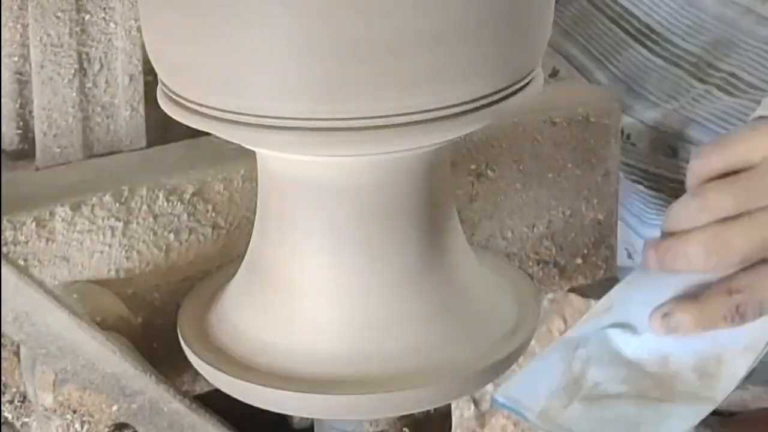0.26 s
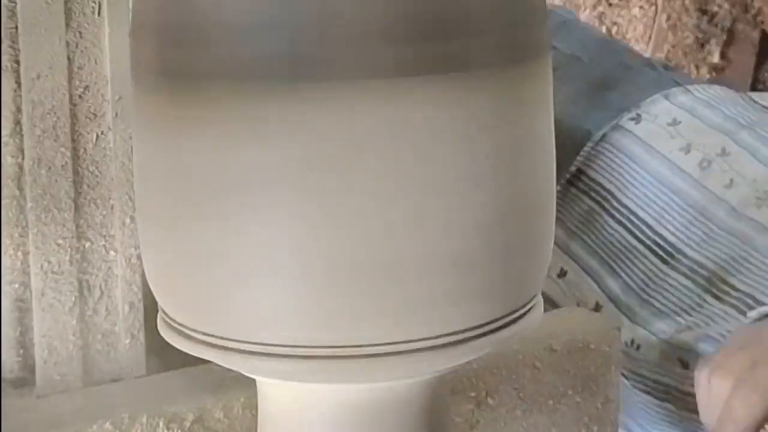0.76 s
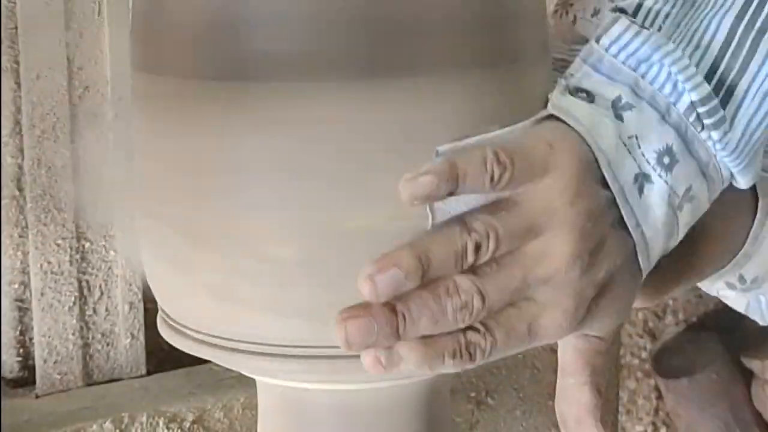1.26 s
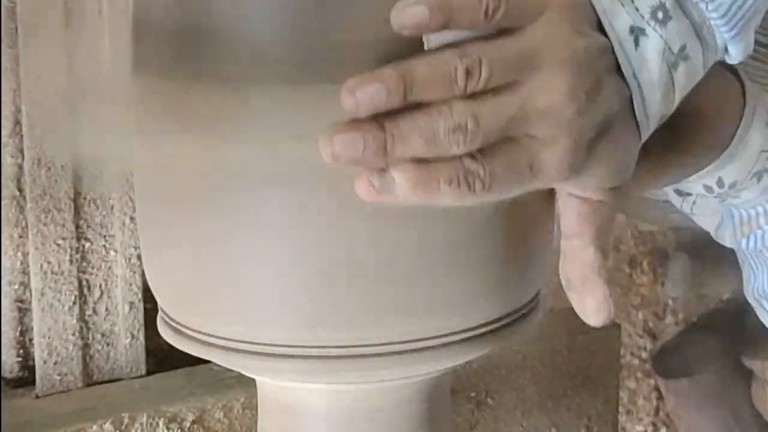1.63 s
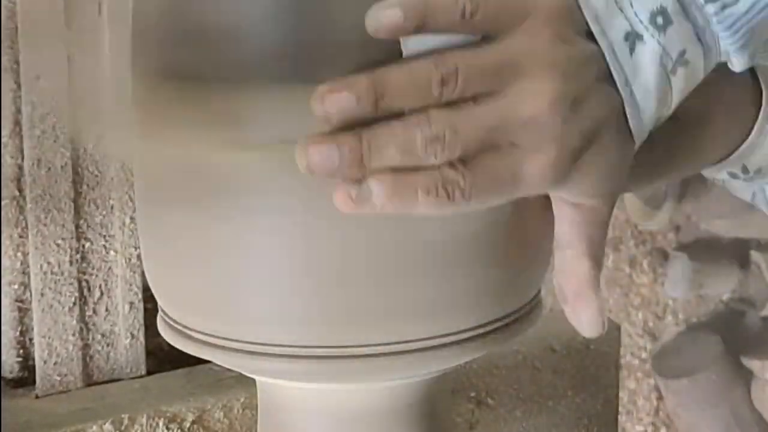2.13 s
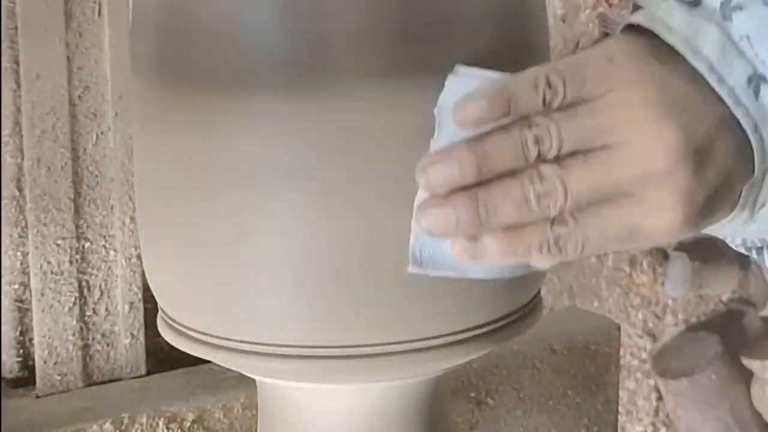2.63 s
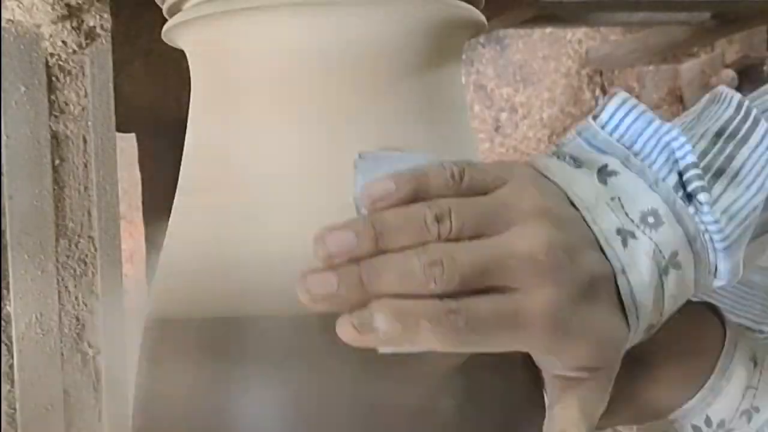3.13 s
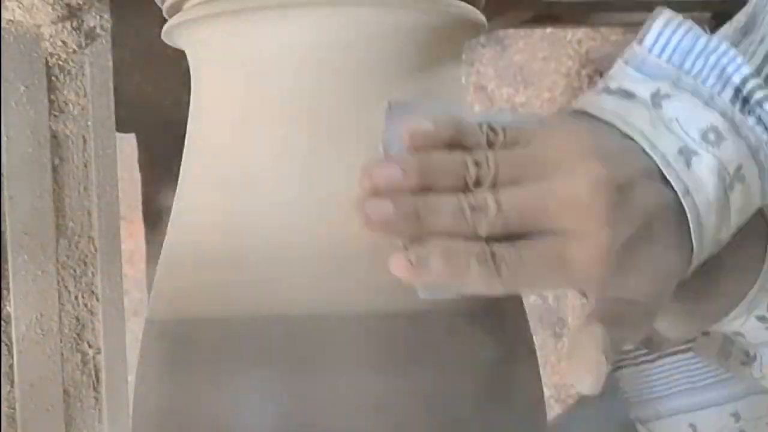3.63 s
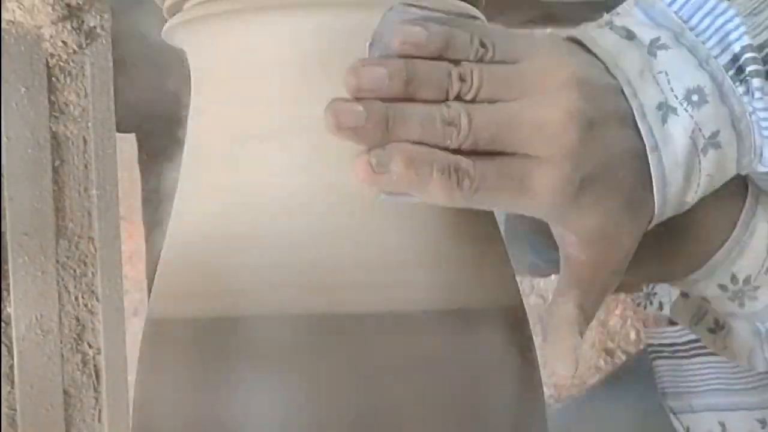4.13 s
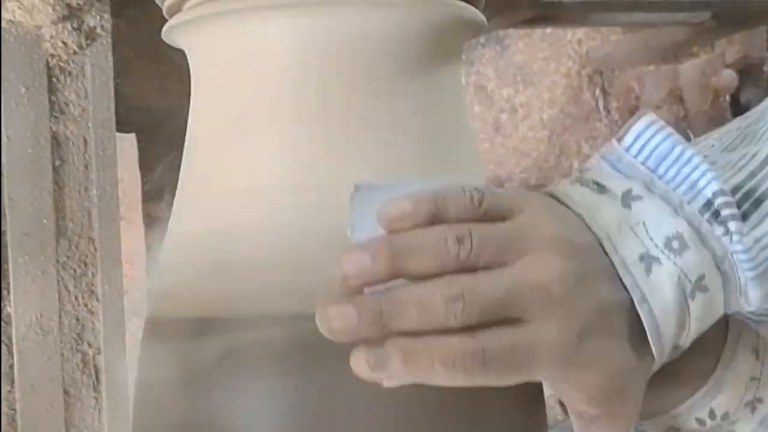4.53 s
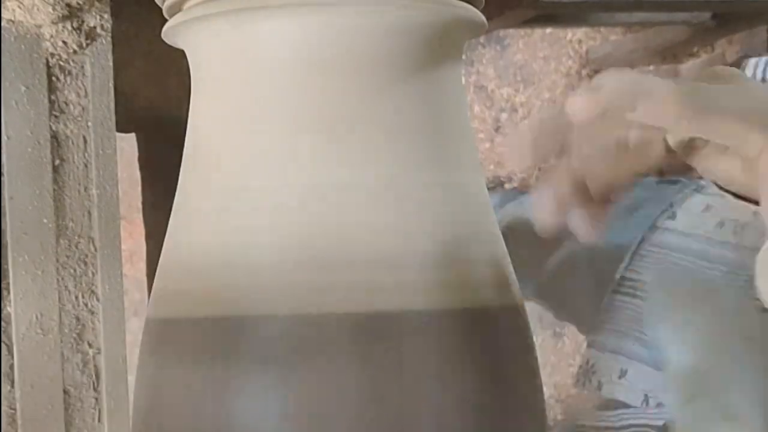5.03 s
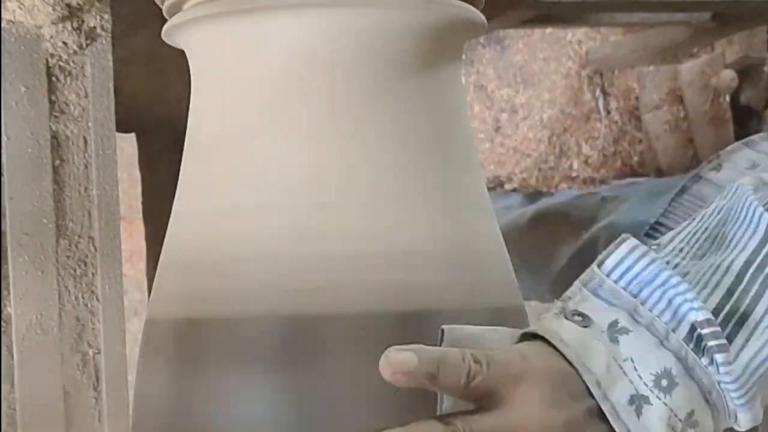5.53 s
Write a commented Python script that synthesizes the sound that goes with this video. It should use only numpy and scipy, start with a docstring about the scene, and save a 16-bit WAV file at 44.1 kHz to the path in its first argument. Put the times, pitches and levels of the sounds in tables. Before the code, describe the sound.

A close, dry stereo view of sanding in a small workshop. A lathe runs throughout: a thin bearing whine near 825 Hz with weaker neighbouring tones, wavering and briefly breaking, over a faint low throb of nearly four beats per second and a soft broad rumble. Sandpaper hiss, bright and slightly left, comes in strokes. A very faint one ends by 0.2 s; fuller ones run 0.4-0.75 and 0.9-1.1 s, with a quick dull touch at 1.2 s leading straight into a long, strong stroke until 2.6 s, easing slightly. Another follows at 2.65-2.95, a stronger one at 3.0-3.6, then a long, smooth, airy one at 3.65-4.75 s with small catches. A short, coarser stroke starts at 4.8 s with a tiny dull tap and lifts at 5.0; a soft low bump follows at 5.1. After a gap of machine sound, the last stroke hisses from 5.3 s, weakening towards the end. Echo is faint and short.

```python
"""In a small workshop, close to a two-port microphone, sandpaper is held against a wooden vase on a lathe.
Strokes of random grit scratches hiss brightly and stop as the hand lifts; one landing taps the wood, and
once the hand bumps the work, sounding a few damped modes. Underneath, the bearing whines in wavering
partials, two close drive tones throb, and noise rings the frame. A short echo follows sheet and tap.
"""
import sys
import numpy as np
from scipy import signal
from scipy.fft import rfft, irfft
from scipy.io import wavfile

SR = 44100
rng = np.random.default_rng(int(sys.argv[2]) if len(sys.argv) > 2 else 0)


def inscribe(sig):
    """Save sig as 16-bit PCM at rate SR to the path in sys.argv[1].

    A 1-D sig is mono; a 2-D sig holds one channel per row.
    Samples are clipped to [-1, 1] before scaling.
    """
    pcm = np.round(np.clip(np.atleast_2d(sig).T, -1, 1) * 32767)
    wavfile.write(sys.argv[1], SR, pcm.astype(np.int16))


N = 254456
TIME, FREQS = np.arange(N) / SR, np.fft.rfftfreq(N, 1 / SR)

# Strokes of the sheet. Each row: touch, lift and release in seconds, hiss level in dB, change until the
# lift in dB, rasp, ring and sheen over the hiss in dB, extra rasp at the touch in dB, left minus right in dB.
STROKES = [(-0.09, 0.202, 0.027, -63.5, 7, -8.5, -14, 3, -7, 5.5),
           (0.389, 0.738, 0.042, -51.5, 0.3, -13, -16.5, -2, -1.5, 5.5),
           (0.88, 1.104, 0.015, -52.5, 1, -15.5, -16.5, 2.5, 2.5, 4.5),
           (1.186, 1.237, 0.072, -59, -8, -16, -9, -4, 5, 6),
           (1.238, 2.568, 0.05, -46.5, -2.9, -12.5, -15, 3, 7, 4),
           (2.66, 2.938, 0.053, -51, 1.5, -14.5, -23, 1, 2.5, 5),
           (2.996, 3.557, 0.082, -47.5, -2.5, -19, -18, 1.8, 8, 3.5),
           (3.664, 4.736, 0.047, -49, 1.5, -20, -21, -1, -9, 3.5),
           (4.821, 5.013, 0.046, -56, 4.5, -8.5, -16, 1, -1, 4),
           (5.328, 5.848, .03, -49.5, -6, -12, -20, 3, 8, 4)]
ATTACK_S = 0.016  # the sheet settles on the wood
# Each stroke starts with its extra rasp, which fades; dB of sheen lost per dB of extra rasp.
FRESH_RASP_S, FRESH_DULLING = 0.15, 0.73
# Colours of the four parts of the scratching. Each row: frequency in Hz, relative level in dB.
RASP_COLOUR = [(700, -24), (1600, -9), (2400, -6), (3100, -1), (3800, .3), (4400, -2), (5200, -10),
               (7500, -35)]
RING_COLOUR = [(3600, -13), (4300, -1.5), (4900, 0), (5500, -1.5), (6000, -6), (7000, -25)]
HISS_COLOUR = [(5100, -35), (5800, -13), (6400, -5), (7100, -.3), (8500, 0), (10000, -1.7), (11300, -3.7),
               (12500, -4), (15000, -30)]
SHEEN_COLOUR = [(8500, -14), (11500, -11), (13000, -3.5), (14000, -1), (14700, .5), (15500, -2)]
# The two microphone ports hear the treble differently. Each row: frequency in Hz, left minus right in dB.
PORT_TILT = [(2000, -2.5), (5800, -4), (7100, -1.5), (8700, -5), (11000, -3.5), (12800, -1), (14500, 2)]
DRIFT_DB, DRIFT_HZ = .8, 9  # the fingers never press evenly, so hiss and sheen drift apart
ROCK_DB, ROCK_HZ = 1.3, 12  # the sheet rocks, so rasp and ring come and go
FLUTTER_DB, FLUTTER_HZ = .75, 32  # the sheet flutters on the uneven grain of the turning wood
# The grit catches or slips for an instant. Each row: time in seconds, level change in dB.
CATCHES = [(.025, 4.5), (1.018, 3.5), (1.36, 0.5), (1.85, -0.5), (1.99, 0.5), (2.16, -2), (3.16, -4),
           (3.23, 3), (3.91, 0), (4.37, -0.5), (4.46, -4.5), (5.415, 1.5), (5.58, -0.5)]
CATCH_S = 0.03
# The ring changes as the sheet shifts on the wood or rides a rim.
# Each row: time in seconds, width in seconds, level change in dB.
RING_SWELLS = [(.54, 0.12, 12.5), (1.52, 0.057, 4.5), (2.28, 0.05, 4), (2.55, 0.036, 7), (3.24, .05, -3),
               (3.54, 0.037, 3), (3.75, .04, 12), (3.98, 0.037, 7), (4.22, 0.048, 5), (4.7, .04, 5)]

TAP_S, TAP_DB, TAP_T60_S = 4.845, -46.5, .022
# Colour of the tap as the sheet lands. Each row: frequency in Hz, relative level in dB.
TAP_COLOUR = [(300, -5), (700, -1), (1300, 0), (1900, -11), (5000, -20)]
BUMP_S = 5.075
# Modes of the bumped work.
# Each row: frequency in Hz, peak level in dB before push and decay, t60 in seconds.
BUMP_MODES = [(111, -49, 0.15), (126, -66, 0.067), (300, -55, 0.074), (364, -30.5, 0.016)]

# Bearing partials, most about 90 Hz apart; lowest, second, strongest and the one just above it come first.
# Each row: frequency in Hz, level in dB, restless share from 0 to 1, lead of the left port in radians.
WHINE = [(530, -71, .08, -.9), (736.5, -58.7, .003, -.6), (826.4, -52.6, .002, .1), (917, -62.5, .2, -1.3),
         (798.5, -68.5, .3, 0), (1008, -68.3, .4, -1), (1189, -68.3, .4, -2.2), (1281, -73, .4, -.3),
         (1366, -69, .25, 1.6)]
# Load on the spindle sags the pitch; only the ratio to the median is used.
# Each row: time in seconds, strongest partial in Hz.
SPINDLE = [(.6, 827.3), (1.1, 826.7), (1.5, 824.4), (1.85, 823), (2.1, 825.6), (3.8, 825.9), (4.4, 826.5),
           (5.3, 826.4), (5.7, 825.3)]
# Slow levels of two partials, used relative to their medians. Each row: time in seconds, level in dB.
STRONGEST_LEVEL = [(0, -53), (.22, -52.5), (.3, -56.5), (.47, -56), (.56, -52.5), (.75, -52.5), (.85, -56),
                   (1.0, -52), (1.2, -55.5), (1.35, -52), (1.44, -57.5), (1.67, -55), (1.85, -61),
                   (2.02, -54), (2.55, -51.7), (2.7, -54.5), (2.95, -51.5), (3.3, -54.5), (4.05, -56),
                   (4.7, -52), (5.2, -55), (5.4, -53.5), (5.77, -55.5)]
SECOND_LEVEL = [(0, -58.5), (1.25, -58.5), (1.45, -65), (1.6, -61), (1.85, -66), (2.02, -58.5), (3.1, -57),
                (3.7, -60.5), (4.0, -57.5), (4.6, -57), (5.77, -60.5)]
# The partial just above the strongest comes and goes. Each row: time in seconds, level change in dB.
ABOVE_SWELL = [(.2, -6), (.4, 3), (.7, -4), (1.8, 1), (2.5, -5), (3.0, -2), (3.25, 3.5), (3.8, 4),
               (4.2, -2), (5.77, 1)]
# The lowest partial swells late in the scene, then falls back.
# Each row: time in seconds, level change in dB.
LOWEST_SWELL = [(3.0, -7), (3.7, 3), (4.05, 8.5), (4.6, 9.5), (5.0, 5), (5.2, -7)]
# The whine breaks briefly. Each row: time in seconds, 1 if the second partial breaks too.
BREAKS = [(.25, 1), (.31, 0), (.47, 0), (.81, 0), (.87, 0), (.92, 1), (1.21, 1), (1.41, 1), (1.84, 1),
          (2.625, 1), (2.67, 0), (3.03, 0), (3.67, 1), (4.06, 0), (4.23, 0), (4.44, 0), (4.84, 1),
          (5.125, 1), (5.195, 1), (5.26, 1), (5.345, 1), (5.51, 0)]
BREAK_DB, BREAK_S, BREAK_SLIP_RAD = -11, .012, 1.1

# The drive throbs: a tone and its twin a little higher, the twin's level in dB over the tone.
THROB_HZ, THROB_DB, TWIN_DB, BEAT_HZ, BEAT_PEAK_S = 160.9, -73.3, -3, 3.68, .16
# Upper hum of the drive. The row: frequency in Hz, level in dB, restless share from 0 to 1.
HUM = (204.5, -75.8, .7)

# Broad rumble of the running machine. Each row: frequency in Hz, level in dB per Hz.
RUMBLE = [(25, -120), (60, -109), (95, -97), (135, -100), (240, -99), (400, -89), (750, -85.5), (900, -85),
          (1150, -86), (1550, -94.5), (2200, -100.5), (3400, -104), (6000, -119), (8000, -121),
          (12000, -130)]
# Resonances of frame and belt guard.
# Each row: frequency in Hz, width in Hz, power added relative to the rumble in dB.
FRAME_RESONANCES = [(197.8, 29, 13.5), (270, 17.7, 11.5), (353, 40, 6.5), (461.8, 22, 7.5), (528, 42, 5),
                    (615, 9.5, 11), (694, 56, 1), (787, 150, 2), (1015, 26, 5.5), (1287, 38, 3),
                    (1351, 40, 9.5), (1552, 21, 5.5)]
# Likeness of the rumble left and right. Each row: frequency in Hz, correlation.
LIKENESS = [(150, 0.93), (300, 0.9), (650, 0.45), (1000, 0.026), (1450, -0.23), (2500, 0.19), (6000, -0.54)]
ROOM_T60_S, ROOM_DB = .12, -15
TOP_HZ = 15480


def sandpaper():
    """Pressure sets each stroke's level; the lie of the sheet trades rasp and ring against sheen."""
    rasp = band(grit(per_second=9000, spread_db=2), RASP_COLOUR)
    ring = band(grit(per_second=9000, spread_db=2), RING_COLOUR)
    hiss = band(grit(per_second=36000, spread_db=4.0), HISS_COLOUR)
    sheen = band(grit(per_second=54000, spread_db=5.5), SHEEN_COLOUR)
    ring_swell_db = sum(db * bell(s, width_s) for s, width_s, db in RING_SWELLS)
    rasp = rasp * undb(ROCK_DB * walk(ROCK_HZ))
    ring = ring * undb(ROCK_DB * walk(ROCK_HZ) + ring_swell_db)
    hiss = hiss * undb(DRIFT_DB * walk(DRIFT_HZ))
    sheen = sheen * undb(DRIFT_DB * walk(DRIFT_HZ))

    sides = np.array([[1], [-1]]) / 2  # half of a left-minus-right difference to each port
    sound = 0
    for touch_s, lift_s, release_s, db, change_db, rasp_db, ring_db, sheen_db, fresh_db, pan_db in STROKES:
        bite_db = fresh_db * np.exp(-np.maximum(TIME - touch_s, 0) / FRESH_RASP_S)
        coarse = (rasp * undb(rasp_db) + ring * undb(ring_db)) * undb(bite_db)
        fine = hiss + sheen * undb(sheen_db - FRESH_DULLING * bite_db)
        pressure = contact(touch_s, lift_s, release_s, change_db)
        sound = sound + (coarse + fine) * pressure * undb(db + sides * pan_db)

    flutter_db = FLUTTER_DB * walk(FLUTTER_HZ)
    catch_db = sum(db * bell(s, CATCH_S) for s, db in CATCHES)
    return shape(sound * undb(flutter_db + catch_db), undb(sides * over_freqs(PORT_TILT)))


def grit(per_second, spread_db):
    """Countless tiny scratches of uneven size, struck independently for the two ports."""
    strikes = rng.random((2, N)) < per_second / SR
    sizes = undb(spread_db * rng.standard_normal((2, N)))
    return strikes * rng.standard_normal((2, N)) * sizes


def contact(touch_s, lift_s, release_s, change_db):
    """One stroke: the sheet settles, the hand leans in or eases off, then lifts."""
    age = np.maximum(TIME - touch_s, 0)
    attack = (1 - np.exp(-age / ATTACK_S)) ** 2
    hold = undb(change_db * np.minimum(age / (lift_s - touch_s), 1))
    release = np.where(TIME < lift_s, 1, bell(lift_s, release_s))
    return attack * hold * release


def tap():
    """A small dull tick of decaying noise as the stiff sheet lands on the wood."""
    age = TIME - TAP_S
    decay = undb(TAP_DB - 60 * np.abs(age) / TAP_T60_S)
    return band(rng.standard_normal(N), TAP_COLOUR) * (age > 0) * decay


def bump(push_s=0.0037):
    """A soft push of the hand sets a few low, quickly damped modes going."""
    age = np.maximum(TIME - BUMP_S, 0)
    modes = sum(undb(db - 60 * age / t60_s) * np.sin(2 * np.pi * hz * age) for hz, db, t60_s in BUMP_MODES)
    push = np.sin(np.pi / 2 * np.minimum(age / push_s, 1)) ** 2
    return modes * push


def bearing():
    """A row of clean partials that waver separately and sag in pitch together under load."""
    strongest_hz = curve(SPINDLE)
    turns = np.cumsum(strongest_hz) / SR / np.median(strongest_hz)  # seconds stretched by the load
    strongest_db, second_db = curve(STRONGEST_LEVEL), curve(SECOND_LEVEL)
    lowest, second, strongest, above, *rest = WHINE
    all_breaks = [s for s, _ in BREAKS]
    wide_breaks = [s for s, wide in BREAKS if wide]
    whine = broken(turns, all_breaks, strongest) * undb(strongest_db - np.median(strongest_db))
    whine = whine + broken(turns, wide_breaks, second) * undb(second_db - np.median(second_db))
    whine = whine + partial(turns, *above) * undb(curve(ABOVE_SWELL))
    whine = whine + partial(turns, *lowest) * undb(curve(LOWEST_SWELL))
    return whine + sum(partial(turns, *row) for row in rest)


def broken(turns, times, row):
    """A partial that dips at each break and comes back a little out of step."""
    dips_db = BREAK_DB * sum(bell(s, BREAK_S) for s in times)
    slips = 0
    for s in times:
        step = (1 + np.tanh((TIME - s) / BREAK_S * 2)) / 2
        slips = slips + rng.standard_normal() * BREAK_SLIP_RAD * step
    return partial(turns + slips / (2 * np.pi * row[0]), *row) * undb(dips_db)


def partial(turns, hz, db, restless, lead=0, waver_hz=5):
    """One machine tone at both ports: part steady line, part restless ring."""
    share = np.clip(restless, 0, 1)
    ring = unit(walk(waver_hz) + 1j * walk(waver_hz))
    phase = 2 * np.pi * (hz * turns + rng.random()) + np.array([[lead], [-lead]]) / 2
    waver = np.sqrt(1 - share) + np.sqrt(share) * ring
    return undb(db) * np.sqrt(2) * np.real(waver * np.exp(1j * phase))


def drive():
    """Two close tones beat in a slow throb that wanders in level; a restless tone lies above them."""
    phase = 2 * np.pi * (THROB_HZ * TIME + rng.random())
    beat = 2 * np.pi * BEAT_HZ * (TIME - BEAT_PEAK_S)
    throb = undb(THROB_DB) * np.sqrt(2) * (np.cos(phase) + undb(TWIN_DB) * np.cos(phase + beat))
    return throb * undb(walk(rate_hz=1.4)) + partial(TIME, *HUM)


def frame():
    """Rolling noise of motor and belt rings the lathe's frame; the bass reaches both ports alike."""
    power = 1
    for hz, width_hz, db in FRAME_RESONANCES:
        power = power + undb(db) ** 2 / (1 + (2 * (FREQS - hz) / width_hz) ** 2) ** 1.42
    gain = undb(over_freqs(RUMBLE)) * np.sqrt(power * SR / 2)
    alike = np.clip(over_freqs(LIKENESS), -.99, .99)
    mid = shape(rng.standard_normal(N), gain * np.sqrt((1 + alike) / 2))
    side = shape(rng.standard_normal(N), gain * np.sqrt((1 - alike) / 2))
    return np.array([mid + side, mid - side]) * undb(1.05 * walk(rate_hz=5.0))


def workshop(x, t60_s, wet_db):
    """A faint, short echo from the cluttered room, as a decaying noise tail for each port."""
    tail = rng.standard_normal((2, SR // 2)) * np.exp(-np.log(1000) * TIME[:SR // 2] / t60_s)
    tail /= np.sqrt(np.sum(tail ** 2, axis=1, keepdims=True))
    return x + undb(wet_db) * signal.fftconvolve(x, tail, axes=1)[:, :N]


def undb(db):
    """Decibels to gain."""
    return 10 ** (np.asarray(db) / 20)


def unit(x):
    """Scale to rms 1."""
    return x / np.sqrt(np.mean(np.abs(x) ** 2))


def curve(rows):
    """Join (seconds, value) rows, sample by sample."""
    s, value = np.transpose(rows)
    return np.interp(TIME, s, value)


def bell(at_s, width_s):
    """A smooth rise and fall around one moment, top 1."""
    return np.exp(-((TIME - at_s) / width_s) ** 2)


def walk(rate_hz):
    """Slow chance of rms 1: noise that weakens above the rate."""
    return unit(shape(rng.standard_normal(N), 1 / (1 + (FREQS / rate_hz) ** 2)))


def over_freqs(points):
    """Join (Hz, value) points on a log-frequency axis."""
    hz, value = np.transpose(points)
    return np.interp(np.log(FREQS + 1), np.log(hz), value)


def shape(x, gain):
    """Filter by a gain for each frequency."""
    return irfft(rfft(x) * gain, N)


def band(x, points):
    """Colour x by a spectrum that falls away beyond its ends; rms 1."""
    low_skirt = np.minimum(FREQS / points[0][0], 1) ** 2
    high_skirt = np.minimum(points[-1][0] / (FREQS + 1), 1) ** 2
    return unit(shape(x, undb(over_freqs(points)) * low_skirt * high_skirt))


def scene():
    """Sanding over the running lathe; only sheet and tap feed the room echo."""
    sanding = workshop(sandpaper() + tap(), ROOM_T60_S, ROOM_DB)
    return sanding + bump() + bearing() + drive() + frame()


def record(dry):
    """The recorder cuts the top steeply with an elliptic low-pass."""
    return signal.sosfilt(signal.ellip(12, .1, 80, TOP_HZ, fs=SR, output="sos"), dry)


dry = scene()
out = record(dry)
inscribe(out)
```